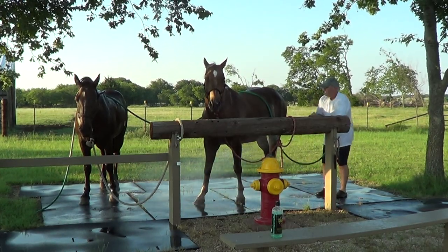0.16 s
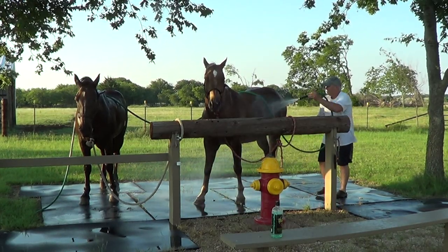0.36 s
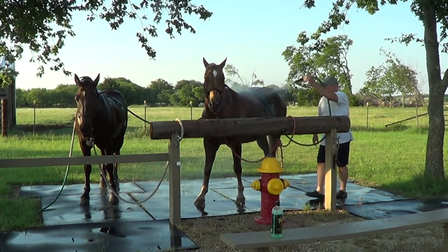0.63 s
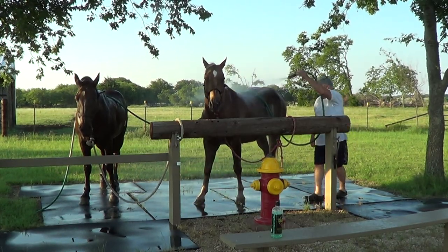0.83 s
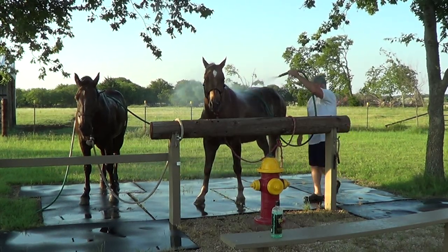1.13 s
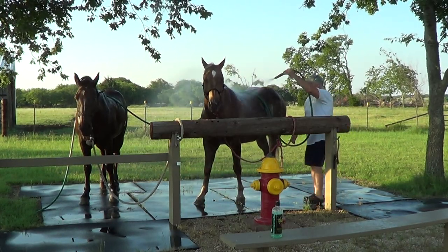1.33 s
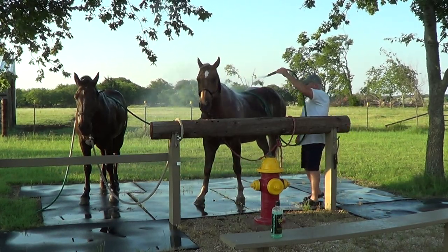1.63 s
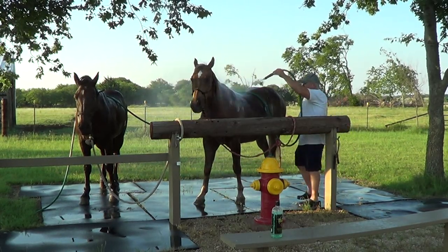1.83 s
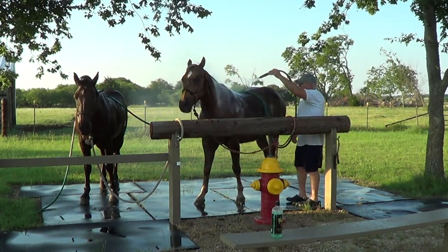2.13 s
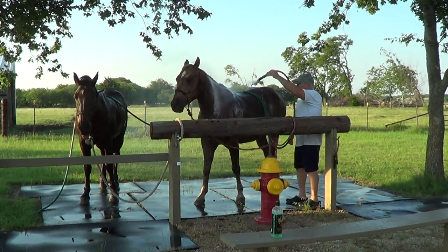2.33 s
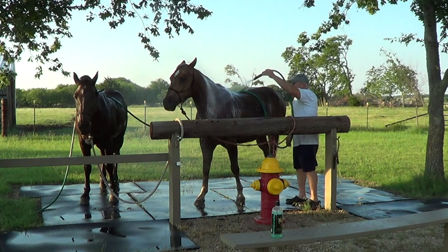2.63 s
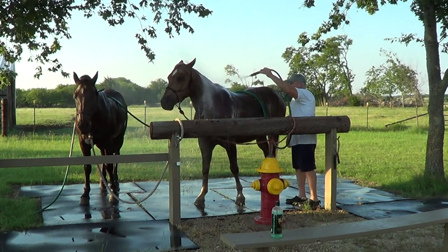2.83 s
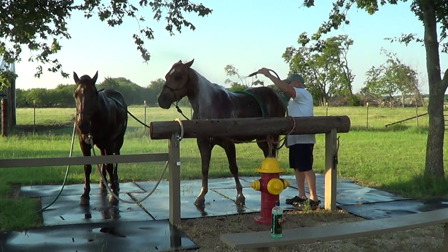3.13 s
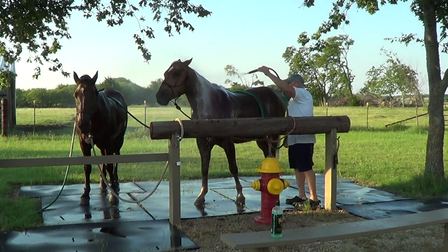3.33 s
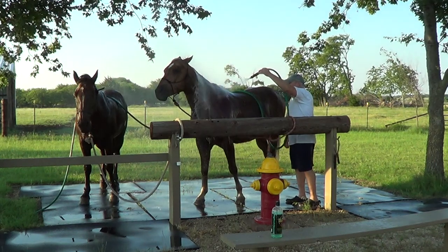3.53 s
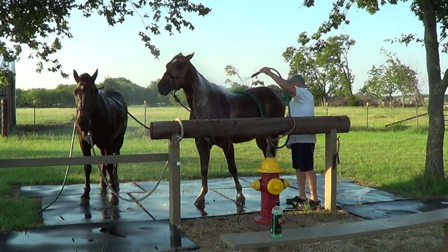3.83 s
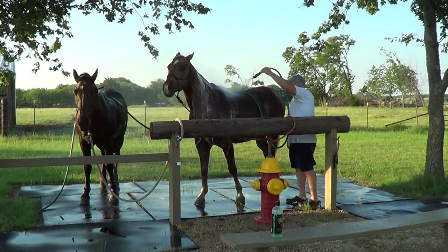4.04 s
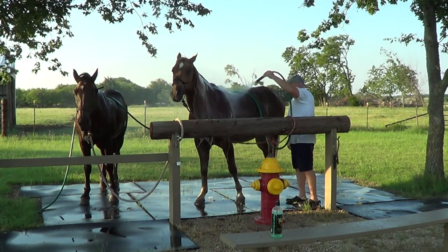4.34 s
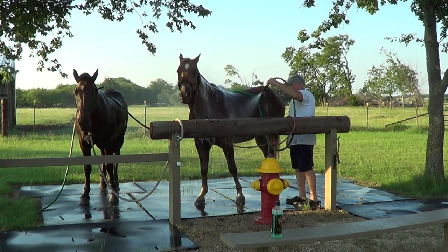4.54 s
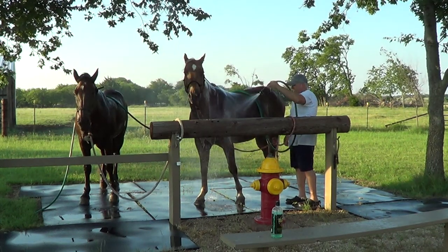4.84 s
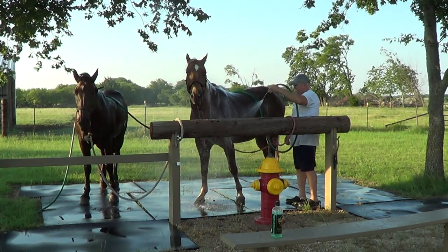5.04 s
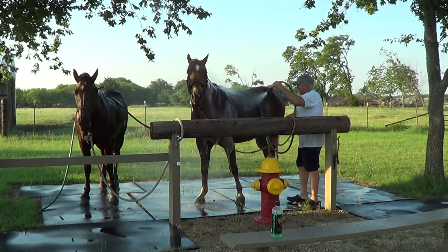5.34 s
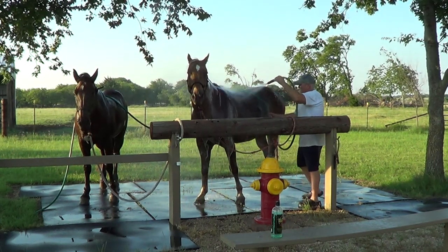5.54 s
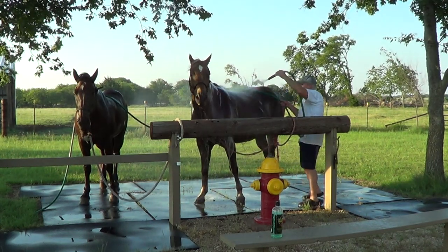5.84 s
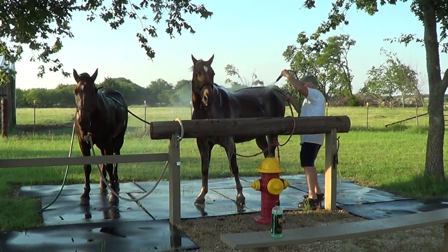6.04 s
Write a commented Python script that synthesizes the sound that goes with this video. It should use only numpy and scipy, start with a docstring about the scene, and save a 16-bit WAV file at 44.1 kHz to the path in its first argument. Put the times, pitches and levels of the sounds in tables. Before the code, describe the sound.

A garden hose sprays a horse on an outdoor wash pad, heard in stereo from some metres away. The spray begins thin, then surges into a bright hiss around 0.3-0.7 s. From 0.7 to 1.5 s quick passes alternate hiss with lower, hollow splashes and patter. A strong hiss swells at 1.5-1.9 s, then longer, steadier sprays run from about 2 to 3.5 s with fine mist sizzling on top. Around 3.9-4.3 s the splash becomes fuller and lower; brighter hissing returns from 4.3 to 5 s. After 5.2 s the passes are short and choppy, with bright bursts near 5.7 and 6 s. Beneath, wind rumbles and buffets the microphone in irregular gusts, busy from 0.7 to 3.2 s, nearly calm around 3.5 s, strongest with rough flutter at 4-4.2 s, then moderate. A faint steady open-field murmur stays behind everything.

```python
"""A garden hose sprays a horse on an outdoor wash pad, heard from some metres away.
Showers of random impacts are coloured by drop size: the fan hisses on the coat, fine mist sizzles above,
and the jet splashes and patters lower where it lands squarely.
Gusts of filtered noise rumble, buffet and flutter at two microphone ports.
A faint, steady open-field murmur lies behind."""
import sys
import numpy as np
from scipy.fft import rfft, irfft, next_fast_len
from scipy.io import wavfile
from scipy.ndimage import map_coordinates

SR = 44100
rng = np.random.default_rng(int(sys.argv[2]) if len(sys.argv) > 2 else 0)


def master_out(mix):
    """Clip the mix to full scale and print it as 16-bit PCM to the path in sys.argv[1]."""
    frames = np.transpose(np.atleast_2d(mix))
    ceiling = np.clip(frames, -1, 1)
    pcm = np.round(ceiling * 32767).astype(np.int16)
    wavfile.write(sys.argv[1], SR, pcm)


N = 272538  # samples

# All layer levels in the tables are before the small gain trims in the functions.

# passes of the jet over the coat: start_s, length_s, hiss_db, splash_re_hiss_db (high when it lands squarely)
JET_PASSES = [(-0.07, 0.2, -27, -9.5), (0.28, 0.24, -24.0, -24), (0.41, 0.3, -19.5, -10.0),
              (0.73, 0.19, -25, -3.5), (0.88, 0.18, -24.5, -19), (0.98, 0.15, -25, 1),
              (1.08, 0.14, -28.0, -0.5), (1.26, 0.15, -27, 1), (1.33, 0.15, -22.5, -6.0),
              (1.51, 0.19, -18.0, -10.5), (1.62, 0.15, -21, -6), (1.72, 0.24, -20.5, -13.5),
              (1.93, 0.24, -22.0, -6.5), (2.09, 0.46, -20.5, -8.5), (2.55, 0.56, -22.5, -8.5),
              (3.04, 0.43, -24.0, -6), (3.55, 0.21, -24, -11), (3.9, 0.22, -25, -3.5),
              (4.13, 0.23, -24.5, -2.0), (4.29, 0.28, -22.0, -6.5), (4.61, 0.24, -20.5, -9.5),
              (4.88, 0.24, -21.0, -11.5), (5.18, 0.18, -22.0, -5), (5.31, 0.15, -25.0, 0.0),
              (5.39, 0.12, -21, -9), (5.5, 0.14, -26.5, 0), (5.6, 0.2, -28.5, 1), (5.7, 0.21, -19, -21.5),
              (5.81, 0.13, -24.0, -2.0), (6.02, 0.19, -19.0, -20)]
# edge of the fan, wetting the horse under and between passes: time_s, hiss_db, splash_db
FAN_EDGE = [(0, -34.5, -45), (0.28, -30.5, -42.5), (0.7, -26.5, -30.5), (2.2, -25, -30.5),
            (3.8, -23.5, -30), (4.12, -26.5, -35.5), (4.6, -27.5, -34), (4.88, -22, -38),
            (5.15, -25, -39.5), (5.5, -23.5, -30.5), (5.8, -27, -34.5), (6.0, -26.5, -29.5)]


def water_levels():
    """The fan moves onto the coat and off again, adding its power to that of the fan's edge."""
    edge_hiss_db, edge_splash_db = curves(FAN_EDGE)
    return swells(JET_PASSES, 0.067, 0.049, edge_hiss_db, edge_splash_db)


# drops of the fan hissing on the coat: pitch_hz, density_db (per Hz, relative)
HISS_COLOUR = [(1500, -39), (3200, -24), (4600, -12), (5300, -7), (6100, -1.5), (6700, 1), (7500, -3),
               (8200, -7), (9000, -1.3), (9700, -0.5), (10900, -6), (11700, -16), (13500, -14),
               (16000, -33)]


def coat_hiss(hiss_db):
    """Dense small drops strike the coat in a bright hiss."""
    shower = drops(HISS_COLOUR, per_second=7000, size_db=3.0, wash_db=6.5, flicker_db=0.5)
    return amp(hiss_db + 0.35) * shower


# finest drops: pitch_hz, density_db (per Hz, relative)
MIST_SPECTRUM = [(9000, -42), (11000, 1), (11900, 0), (13000, 1.5), (14000, -2), (15000, -2.5),
                 (15700, -9.5)]
# mist level when the hiss is at its usual level: time_s, mist_db
MIST_LEVEL = [(0, -33), (1.6, -31), (2.3, -29), (3.0, -29), (3.7, -29), (4.4, -27), (5.0, -31), (5.6, -27),
              (5.8, -31), (6.0, -24.5), (6.15, -33)]


def mist(hiss_surge_db):
    """The finest, densest drops sizzle at the top and partly follow the hiss."""
    base_db, = curves(MIST_LEVEL)
    mist_db = base_db + 0.63 * hiss_surge_db  # dB of mist per dB of hiss
    shower = drops(MIST_SPECTRUM, per_second=11000, size_db=6.0, wash_db=3, flicker_db=1.0)
    return amp(mist_db + 0.55 * wobble(18)) * shower


# splash of a glancing jet: pitch_hz, density_db (per Hz, relative)
GLANCING_COLOUR = [(1800, -30.5), (2600, -22), (3100, -8), (3750, 0.5), (4500, 0.5), (5300, -0.5),
                   (6500, -19.5), (9000, -39)]
# lower, hollower splash of a square hit: pitch_hz, density_db (per Hz, relative)
SQUARE_COLOUR = [(1800, -38), (2600, -18), (3100, -5.5), (3700, -1), (4150, 0), (4800, -8.5), (6000, -12.5),
                 (9000, -33)]


def splash(hiss_db, splash_db):
    """A jet that lands squarely splashes lower and hollower than a glancing one."""
    balance_db, span_db = -4, 2  # splash against hiss at the even blend; softness of the crossfade
    square = (1 + np.tanh((splash_db - hiss_db - balance_db) / span_db)) / 2
    glancing = drops(GLANCING_COLOUR, per_second=2800, size_db=1.5, wash_db=6.5, flicker_db=0.62)
    hollow = drops(SQUARE_COLOUR, per_second=2200, size_db=2.8, wash_db=6.0, flicker_db=0.3)
    blend = np.sqrt(1 - square) * glancing + np.sqrt(square) * hollow
    return amp(splash_db + 0.96 + 0.5 * wobble(22)) * blend


# heavy drops: pitch_hz, density_db (per Hz, relative)
PATTER_COLOUR = [(500, -13), (1100, -17), (1700, -2.5), (2250, 1.5), (2800, 2.5), (3400, 0.5), (4500, -19),
                 (7000, -38)]


def patter(hiss_surge_db, splash_surge_db):
    """Sparser heavy drops patter low, rising with the splash and with its gain on the hiss."""
    patter_db = -41.5 + 0.42 * splash_surge_db
    patter_db = patter_db + 0.33 * (splash_surge_db - hiss_surge_db)
    shower = drops(PATTER_COLOUR, per_second=1300, size_db=-1, wash_db=1.0, flicker_db=0.2)
    return amp(patter_db + 1.14 * wobble(20)) * shower


def spray():
    """Each pass hisses and splashes; the unsteady jet shakes all drop sizes alike."""
    usual_hiss_db, usual_splash_db = -20, -28
    hiss_db, splash_db = water_levels()
    hiss_surge_db = hiss_db - usual_hiss_db
    splash_surge_db = splash_db - usual_splash_db
    water = coat_hiss(hiss_db) + mist(hiss_surge_db)
    water = water + splash(hiss_db, splash_db) + patter(hiss_surge_db, splash_surge_db)
    jet = amp(0.33 * wobble(21.17) + 0.19 * wobble(170))
    return jet * water


# stereo width of the water: pitch_hz, side_re_mid_db
WATER_WIDTH = [(1000, -21), (2000, -28), (3200, -16.5), (5300, -13.5), (6400, -20.5), (7300, -18.5),
               (8150, -7), (9200, -29), (11000, -44), (14000, -64)]


def drops(spectrum, per_second, size_db, wash_db, flicker_db):
    """Stereo shower, mid near rms 1: impacts of scattered size on a wash of countless smaller ones."""
    lands = rng.random((2, N)) < per_second / SR
    size = amp(size_db * np.clip(rng.standard_normal((2, N)), -2, 2))
    impacts = unit(lands * rng.standard_normal((2, N)) * size)
    # wash_db is the level of the wash against the single impacts
    shower = impacts + amp(wash_db) * rng.standard_normal((2, N))
    # the jet breaks up into clumps, so the drops arrive unevenly
    clumped = shower * amp(flicker_db * wobble(60))
    mid, side = coloured(clumped, spectrum)
    side = filtered(side, lambda hz: amp(along(WATER_WIDTH, hz)))
    return np.array([mid + side, mid - side])


# gusts at the microphone: start_s, length_s, rumble_db, buffet_re_rumble_db
WIND_GUSTS = [(-0.02, 0.24, -33, 6), (0.19, 0.18, -34.5, 4.5), (0.36, 0.21, -32, 4),
              (0.745, 0.056, -26.5, -1.5), (0.84, 0.088, -30.5, 0), (0.985, 0.054, -25.5, 2),
              (1.05, 0.2, -24.5, -2), (1.42, 0.085, -31.5, -2), (1.72, 0.077, -23.5, -1.5),
              (1.81, 0.2, -27.5, 1), (2.0, 0.083, -30, 1), (2.09, 0.12, -25.5, -1.5), (2.235, 0.08, -30, 1),
              (2.32, 0.075, -30, 1.5), (2.44, 0.16, -25, -1), (2.56, 0.28, -28, 2.5), (2.8, 0.23, -35, 3),
              (3.06, 0.22, -26.5, -2), (3.775, 0.054, -32.5, -3), (3.86, 0.242, -27, 0),
              (4.06, 0.14, -22.5, -2), (4.38, 0.12, -28, -2.5), (4.54, 0.16, -31, 4),
              (4.72, 0.11, -31, -0.5), (5.155, 0.093, -27.5, 1), (5.295, 0.086, -27, 1.5),
              (5.45, 0.36, -29, 1.5), (5.8, 0.32, -34, 5)]
# breeze under and between gusts: time_s, rumble_db
BREEZE_LEVEL = [(0, -32), (0.62, -34.5), (0.93, -42), (1.3, -36), (1.55, -45.5), (1.8, -33), (3.28, -36.5),
                (3.52, -53.5), (3.82, -53), (4.22, -34), (4.5, -36.5), (5.05, -33), (5.42, -36.5),
                (6.18, -29.5)]


def wind():
    """Gusts on a breeze rumble and buffet; strong gusts and sharp eddies add a higher flutter."""
    breeze_db, = curves(BREEZE_LEVEL)
    breeze_buffet_db = breeze_db - 3.5
    rumble_db, buffet_db = swells(WIND_GUSTS, 0.025, 0.034, breeze_db, breeze_buffet_db)
    return rumble(rumble_db) + buffet(buffet_db) + flutter(buffet_db)


# lowest wind noise: pitch_hz, density_db (per Hz, relative)
RUMBLE_COLOUR = [(10, -3.5), (25, -14), (45, -2.5), (70, 0.5), (135, 3), (185, -12.5), (280, -15),
                 (700, -76)]


def rumble(rumble_db):
    """Slow turbulence presses on the ports as a deep rumble."""
    return turbulence(RUMBLE_COLOUR, amp(rumble_db + 0.5), lumpy_db=1.5, apart_db=-10.0)


# middle wind noise: pitch_hz, density_db (per Hz, relative)
BUFFET_COLOUR = [(50, -8), (120, -5.5), (170, 4), (250, 0), (400, -7.5), (600, -18), (900, -29),
                 (1500, -51), (3000, -62)]


def buffet(buffet_db):
    """Quicker, lumpier turbulence buffets the ports above the rumble."""
    return turbulence(BUFFET_COLOUR, amp(buffet_db + 0.07), lumpy_db=3.0, apart_db=-7.0)


# highest wind noise: pitch_hz, density_db (per Hz, relative)
FLUTTER_COLOUR = [(100, -23), (300, 8), (480, 3.5), (800, -5), (1200, -12), (1800, -27), (4000, -60)]
# sharpest eddies: time_s, peak_db (before an 8 dB cut; each peak comes 5 ms after its time)
SHARP_EDDIES = [(1.114, -27), (1.202, -23), (1.47, -23), (1.945, -20.5), (2.533, -18), (2.736, -18),
                (2.922, -22), (3.969, -19), (4.029, -13), (4.052, -19), (4.095, -19), (4.112, -13.5),
                (4.154, -25)]


def flutter(buffet_db):
    """The fastest turbulence flutters in brief eddy bursts and swells steeply with the buffet."""
    t, eddy_s, peak_delay_s = np.arange(N) / SR, 0.006, 0.005
    eddies = np.zeros(N)
    for time_s, peak_db in SHARP_EDDIES:
        from_peak_s = t - time_s - peak_delay_s
        eddies += amp(peak_db - 8.0) * np.exp(-0.5 * (from_peak_s / eddy_s) ** 2)
    usual_buffet_db = -28
    churn = amp(-42 + 2.7 * (buffet_db - usual_buffet_db))  # dB of flutter per dB of buffet
    return turbulence(FLUTTER_COLOUR, eddies + churn, lumpy_db=3.0, apart_db=-11.0)


# wind phase between the ports: pitch_hz, left_lead_rad
LEFT_PORT_LEAD = [(30, 0), (110, 0.38), (260, 1.27), (520, 1.84), (800, 1.94), (1500, 1.8)]


def turbulence(spectrum, level, lumpy_db, apart_db):
    """Eddies cross one port, then the other: mostly the same pressure, shifted in phase."""
    lumps = amp(lumpy_db * wobble(100))
    mid, apart = level * coloured(lumps * rng.standard_normal((2, N)), spectrum)

    def lead(hz):
        return np.tan(np.clip(along(LEFT_PORT_LEAD, hz), 0, 2) / 2)

    # a quarter-turned side signal sets left ahead of right
    shifted = filtered(mid, lambda hz: 1j * lead(hz))
    unshared = amp(apart_db) * filtered(apart, lambda hz: np.hypot(1, lead(hz)))
    side = shifted + unshared
    return np.array([mid + side, mid - side])


# open-country air: pitch_hz, density_db (per Hz, relative)
FIELD_COLOUR = [(20, 6), (100, 1.5), (250, -2.5), (500, 1.5), (900, 1), (1400, -0.5), (2500, -2.5),
                (6000, -30)]


def field(level_db, side_db):
    """The steady far-off murmur of air in open country, as coloured noise."""
    mid, side = amp(level_db) * coloured(rng.standard_normal((2, N)), FIELD_COLOUR)
    side = amp(side_db) * side
    return np.array([mid + side, mid - side])


def swells(rows, attack_s, release_s, floor_db, second_floor_db):
    """Levels in dB of two layers: each event rises, holds and falls, adding its power to their floors."""
    t = np.arange(N) / SR
    first, second = amp(floor_db) ** 2, amp(second_floor_db) ** 2
    for start_s, length_s, level_db, relative_db in rows:
        rise = np.clip((t - start_s) / attack_s, 0, 1)
        fall = np.clip((start_s + length_s - t) / release_s, 0, 1)
        shape = rise * fall
        first = first + (amp(level_db) * shape) ** 2
        second = second + (amp(level_db + relative_db) * shape) ** 2
    return 10 * np.log10(first), 10 * np.log10(second)


def amp(db):
    """Decibels to gain."""
    return 10 ** (np.asarray(db) / 20)


def unit(x):
    """Scale to rms 1, over both channels together."""
    return x / np.sqrt(np.mean(x ** 2) + 1e-20)


def along(points, hz):
    """Values of a (pitch_hz, value) table, read on a log pitch axis."""
    pitch_hz, value = np.transpose(points)
    return np.interp(np.log(hz + 1), np.log(pitch_hz + 1), value)


def curves(rows):
    """One value per sample for each column after the time."""
    time_s, *columns = np.transpose(rows)
    return [np.interp(np.arange(N) / SR, time_s, column) for column in columns]


def wobble(rate):
    """A smooth random curve through rate knots a second."""
    knots = rng.standard_normal(int(N * rate / SR) + 4)
    return map_coordinates(knots, [np.arange(N) * rate / SR])


def filtered(x, response):
    """Filter x by a complex response of frequency."""
    size = next_fast_len(N + SR // 2)  # padded so that tails do not wrap round
    spectrum = rfft(x, size) * response(np.fft.rfftfreq(size, 1 / SR))
    return irfft(spectrum, size)[..., :N]


def coloured(x, spectrum):
    """Shape x by a spectrum table, at rms 1."""
    return unit(filtered(x, lambda hz: amp(along(spectrum, hz))))


def scene():
    """Water, wind and the field behind them."""
    return spray() + wind() + field(level_db=-44.5, side_db=-8.5)


# colour difference of the two microphones: pitch_hz, left_minus_right_db
MICROPHONE_BALANCE = [(40, -1.5), (200, 0), (2000, -.3), (3300, -1.7), (4100, -1.8), (5600, 0), (7000, .3),
                      (7900, 2), (8700, -.8), (9400, 0)]


def record(dry):
    """Each microphone adds its colour; nothing passes above the band limit."""
    top_hz = 15760

    def response(hz):
        half_each_way = np.outer([0.5, -0.5], along(MICROPHONE_BALANCE, hz))
        return amp(half_each_way) * (hz < top_hz)

    return filtered(dry, response)


dry = scene()
out = record(dry)
master_out(out)
```